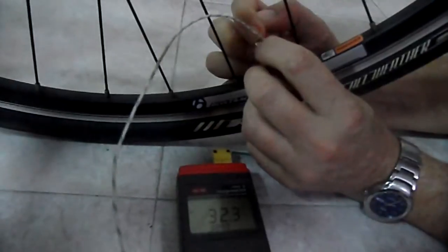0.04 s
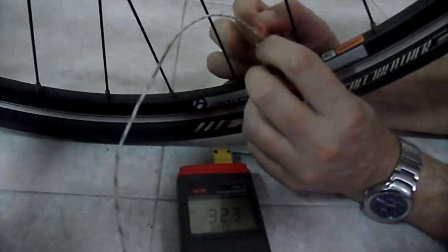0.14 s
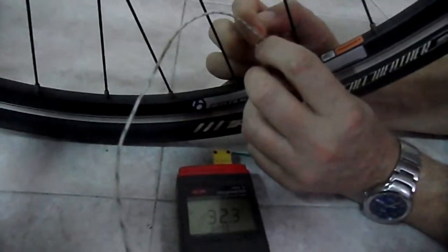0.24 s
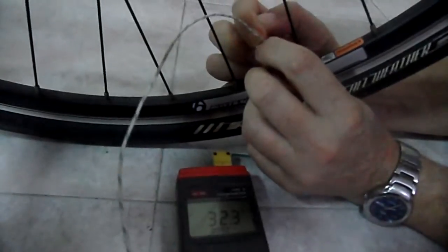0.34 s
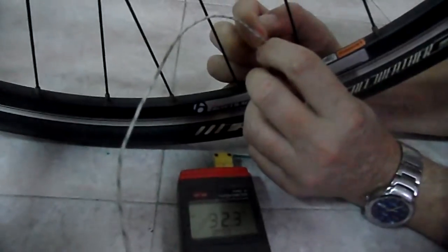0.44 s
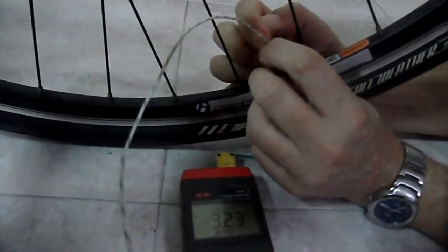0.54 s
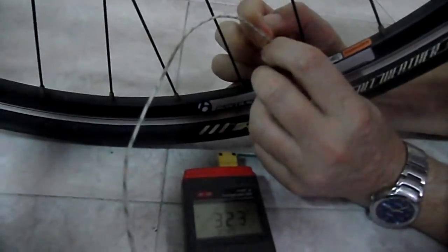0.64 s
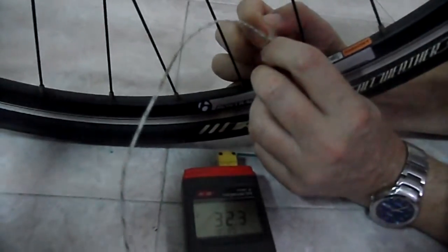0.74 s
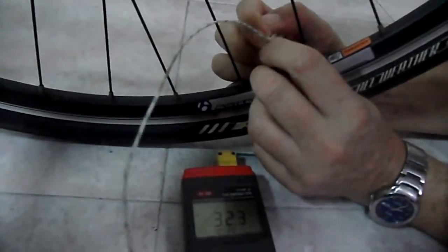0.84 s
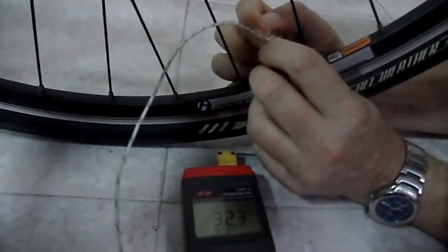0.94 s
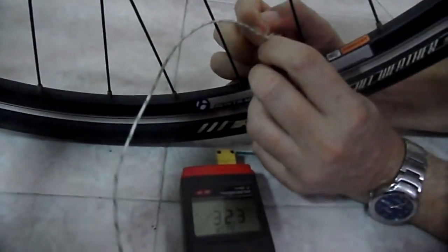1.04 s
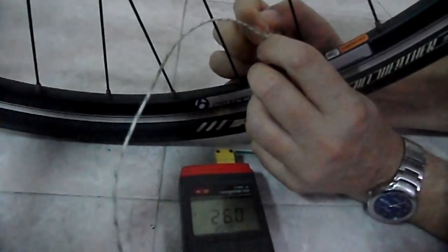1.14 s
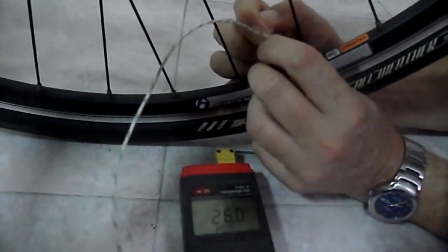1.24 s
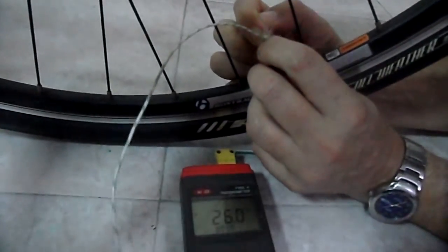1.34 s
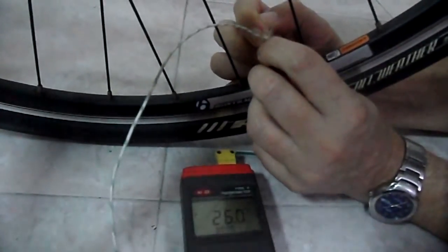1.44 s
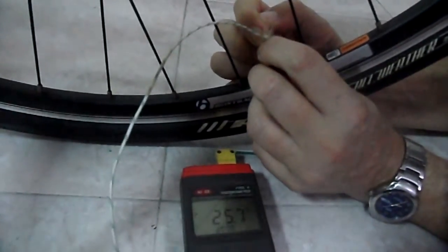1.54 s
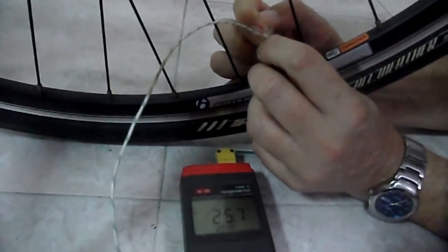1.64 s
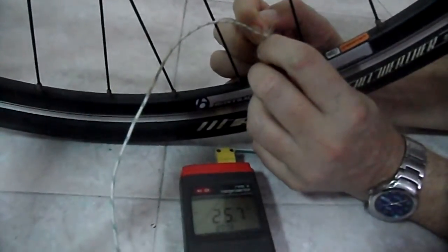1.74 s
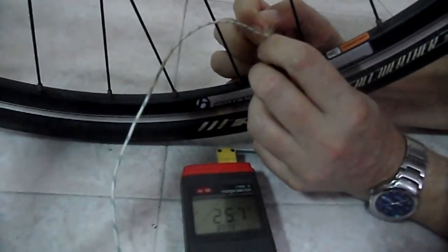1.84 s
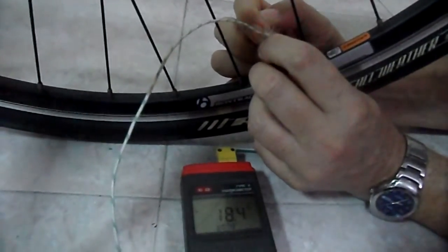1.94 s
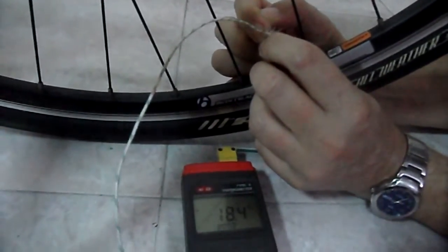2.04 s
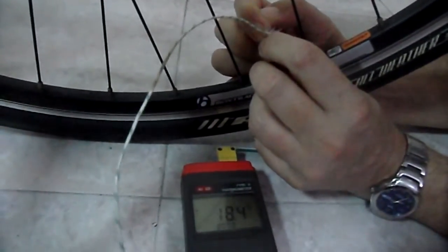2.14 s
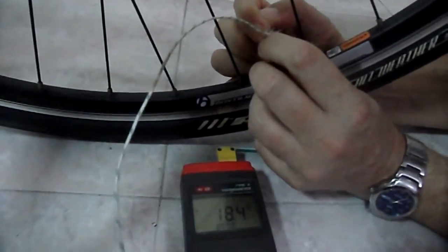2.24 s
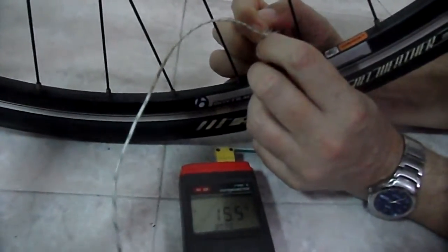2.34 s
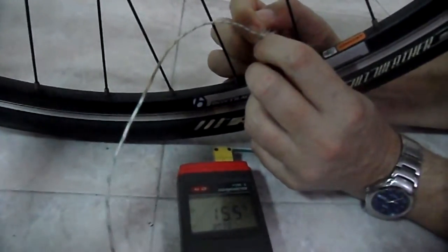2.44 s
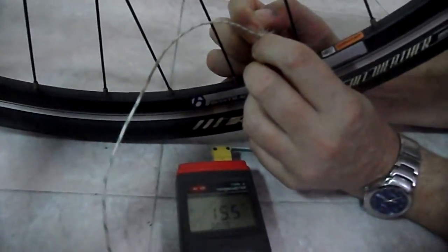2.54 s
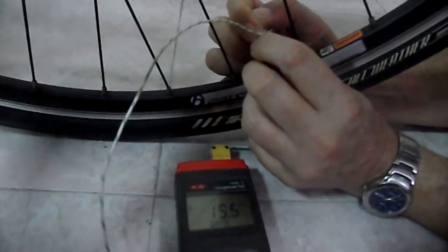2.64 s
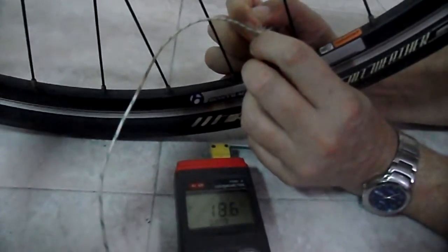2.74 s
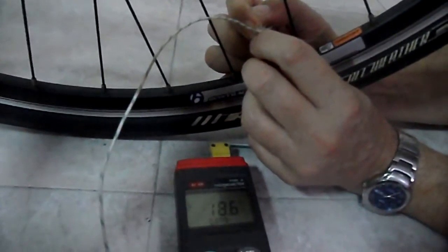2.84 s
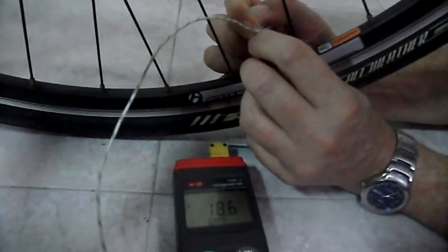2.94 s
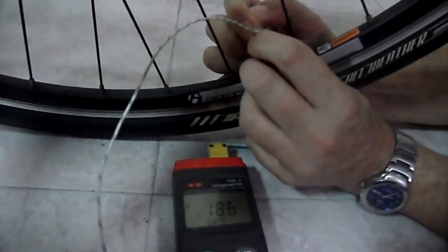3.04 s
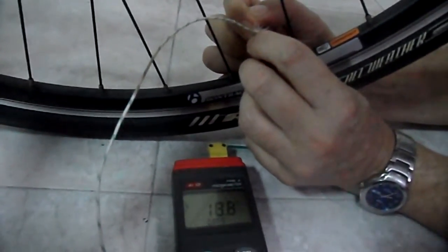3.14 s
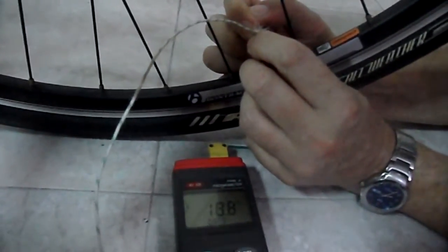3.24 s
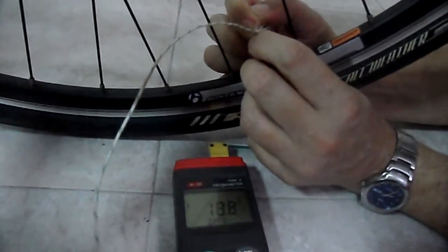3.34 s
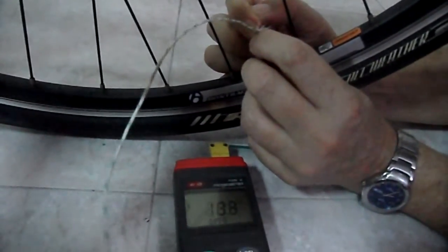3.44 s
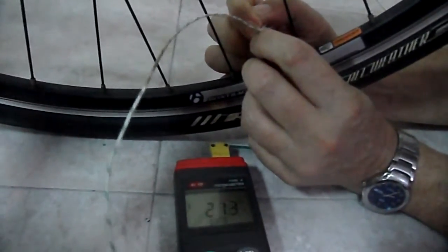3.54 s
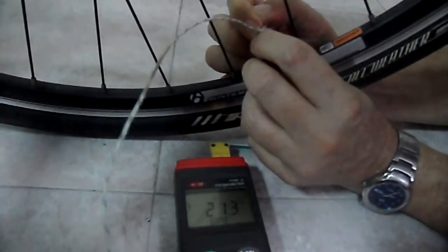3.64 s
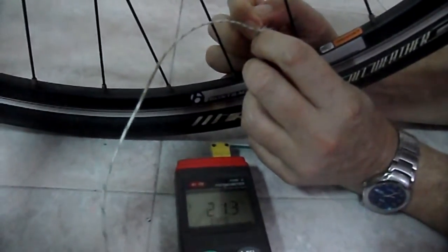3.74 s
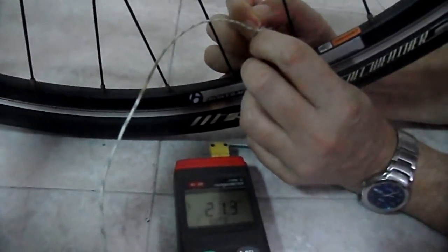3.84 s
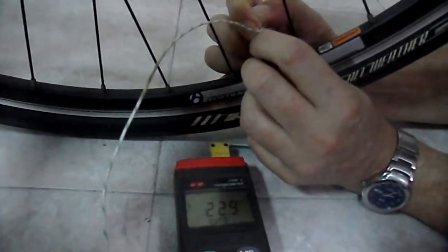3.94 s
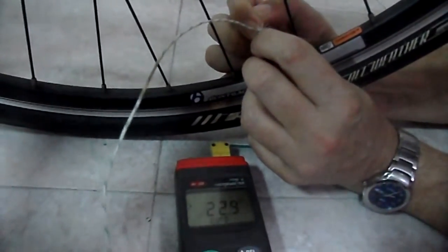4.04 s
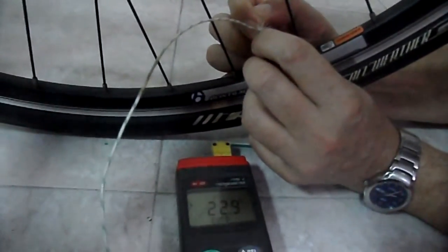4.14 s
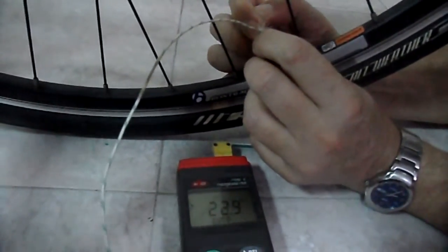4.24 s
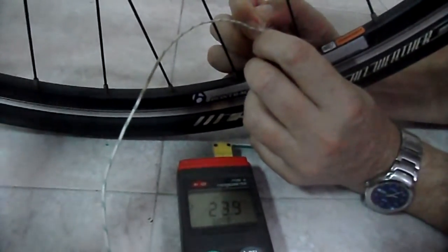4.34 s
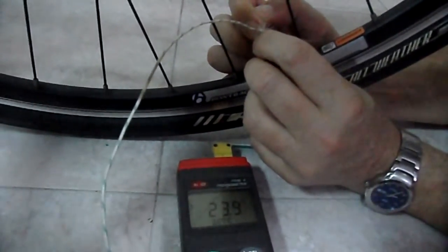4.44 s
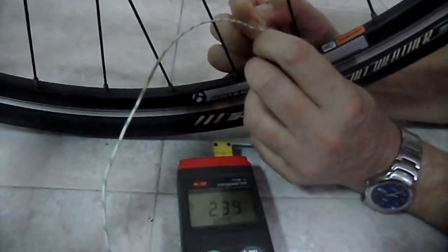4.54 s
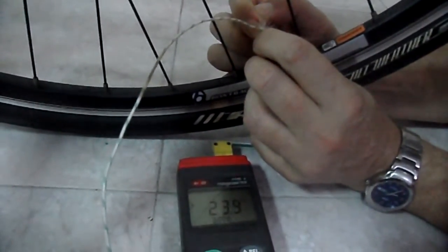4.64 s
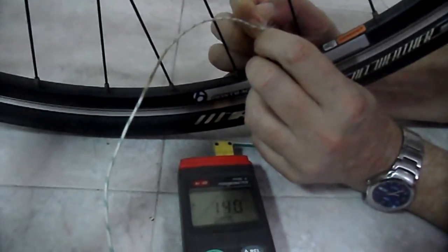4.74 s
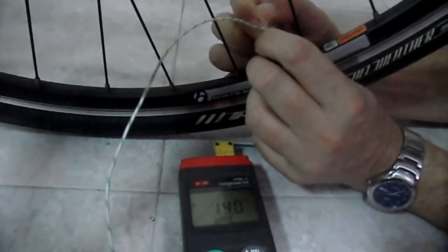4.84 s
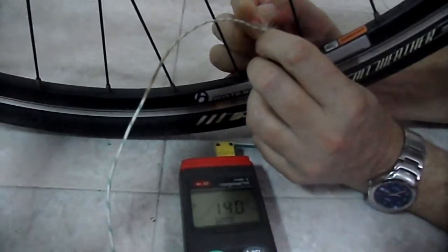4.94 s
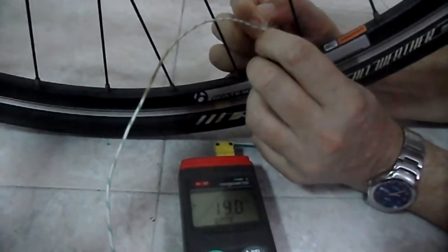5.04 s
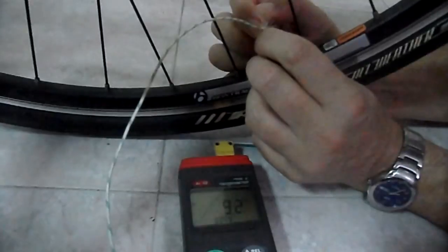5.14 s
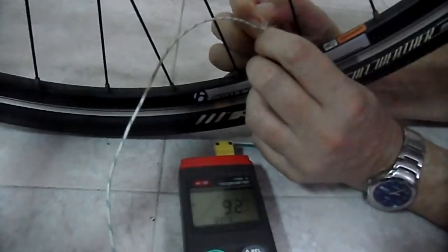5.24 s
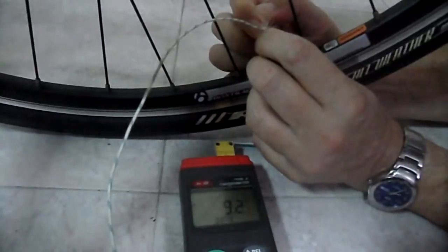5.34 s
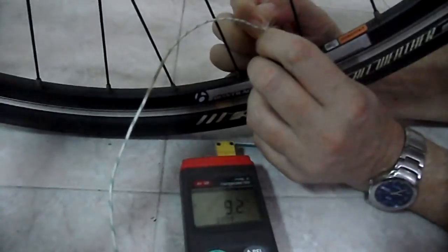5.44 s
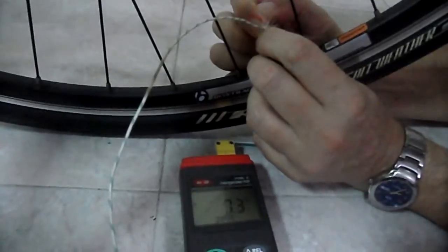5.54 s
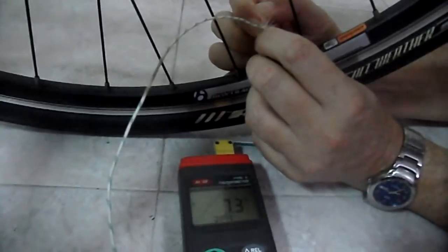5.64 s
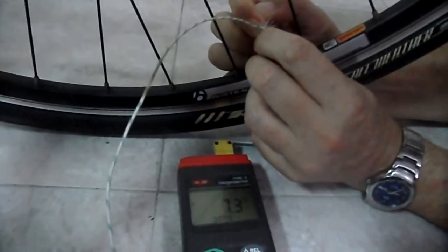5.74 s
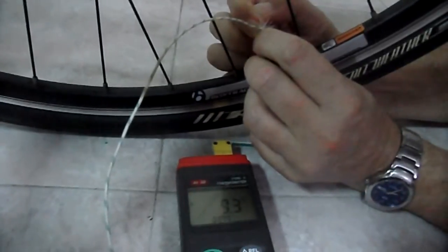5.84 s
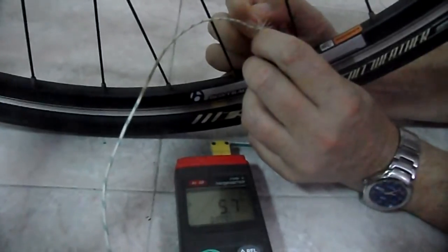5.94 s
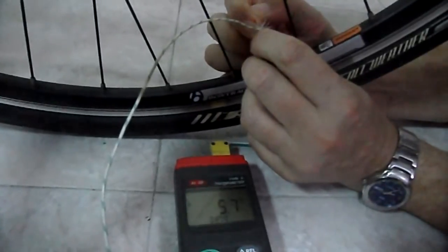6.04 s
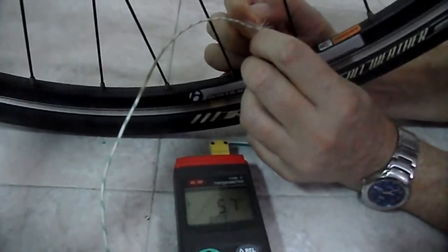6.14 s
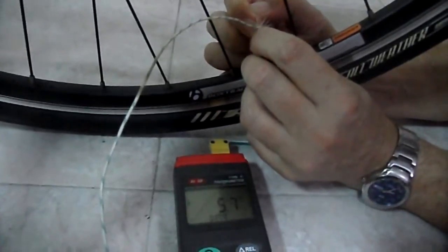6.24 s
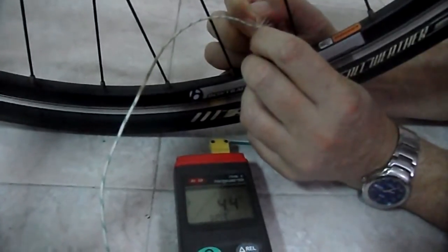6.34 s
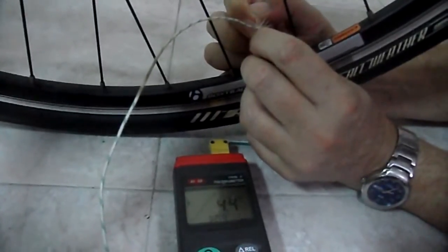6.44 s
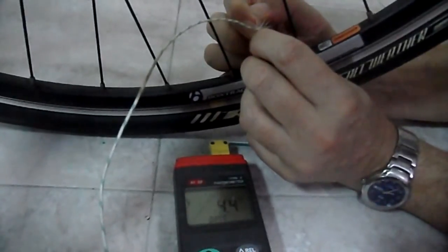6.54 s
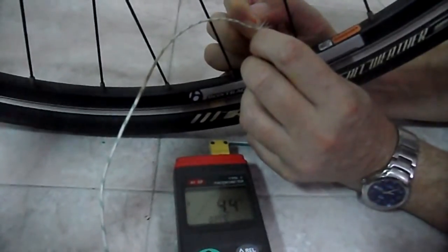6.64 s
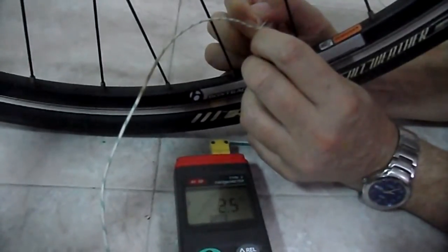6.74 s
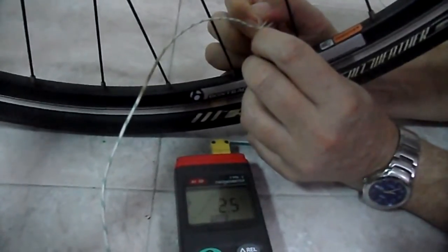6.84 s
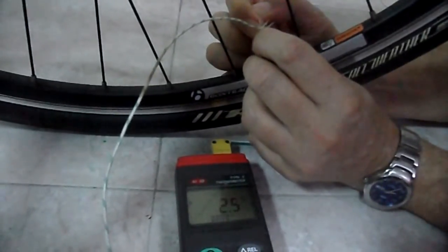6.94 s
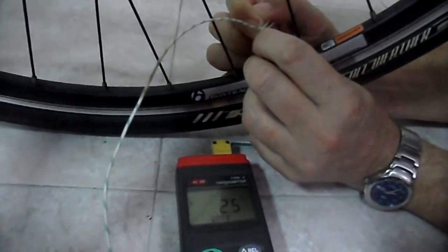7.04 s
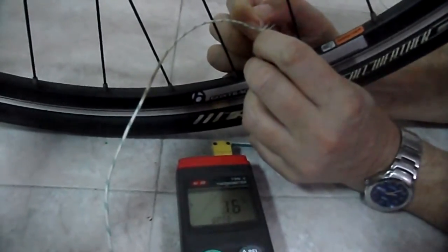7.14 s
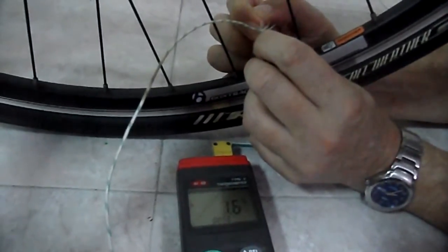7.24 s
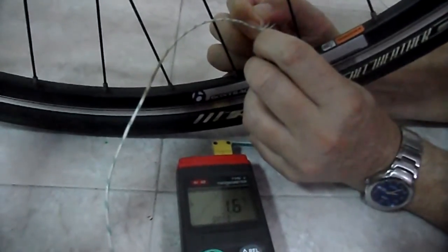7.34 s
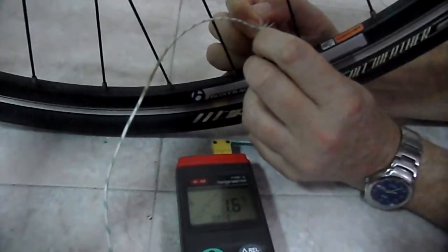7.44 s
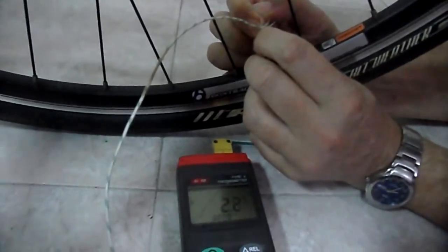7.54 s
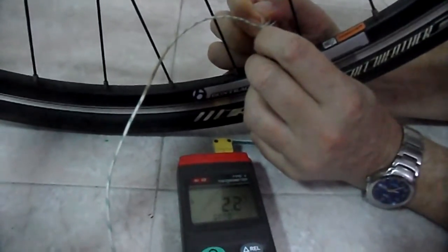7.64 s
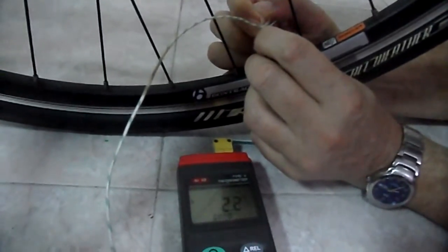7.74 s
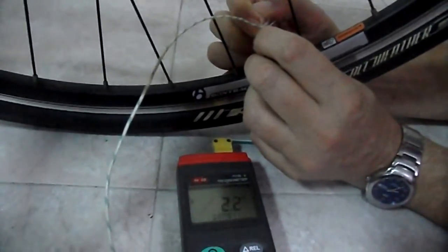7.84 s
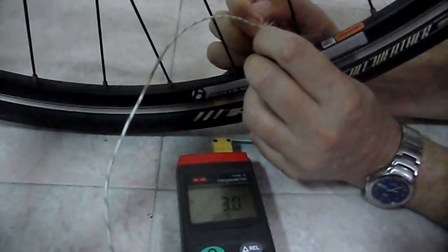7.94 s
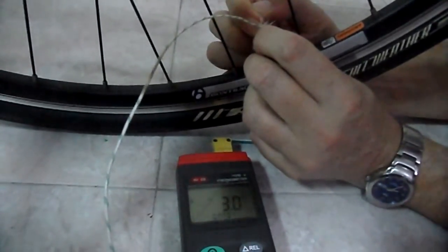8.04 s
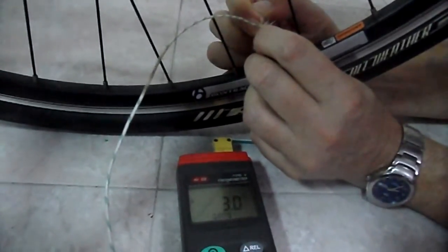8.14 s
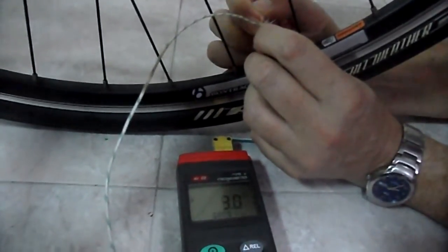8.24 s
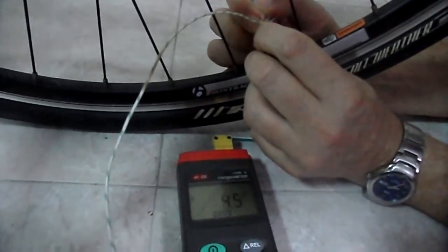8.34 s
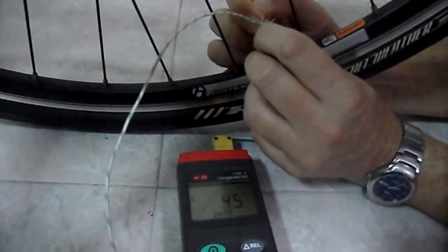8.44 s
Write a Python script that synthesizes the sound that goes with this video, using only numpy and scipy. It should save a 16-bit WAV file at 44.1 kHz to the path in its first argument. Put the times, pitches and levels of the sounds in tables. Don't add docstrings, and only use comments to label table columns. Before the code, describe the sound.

Very close to the microphone, a bicycle valve lets out a sharp popping spurt, a longer blast and a softer one, with quiet gaps between. After a tiny tick, a strong pop opens a long, bright hiss that slowly loses force. Stray air buffets the microphone in low thumps. The tiled room adds a short echo, and a faint engine and traffic drone sit far behind.

```python
import sys
import numpy as np
from scipy import signal
from scipy.fft import irfft
from scipy.io import wavfile
from scipy.ndimage import uniform_filter1d

SR = 44100
rng = np.random.default_rng(int(sys.argv[2]) if len(sys.argv) > 2 else 0)


def volts(x):
    e = np.asarray(x, float) / 20
    return 10 ** e


def put_to_file(sound):
    columns = np.atleast_2d(sound).T
    safe = np.clip(columns, -1, 1)
    whole_steps = np.round(safe * 32767)
    wavfile.write(sys.argv[1], SR, whole_steps.astype(np.int16))


N = 373968


def evened(x):
    return x / np.sqrt(np.mean(x ** 2) + 1e-20)


def read(points, hz, column=1):
    table = np.transpose(points)
    return np.interp(np.log(hz + 1), np.log(table[0] + 1), table[column])


def over_time(rows, column=1):
    table = np.transpose(rows)
    return np.interp(np.arange(N) / SR, table[0], table[column])


def bumps(modes, hz):
    return sum(db / (1 + (2 * (hz - centre) / width) ** 2) for centre, width, db in modes)


def noise_pair(same):
    a, b, c, d = rng.standard_normal((len(same), 4)).T
    same = np.clip(same, -1, 1)
    left = a + 1j * b
    right = same * left + np.sqrt(1 - same ** 2) * (c + 1j * d)
    return np.array([left, right])


def wander(top_hz):
    smooth = uniform_filter1d(rng.standard_normal(N), int(SR / top_hz / 4))
    return evened(signal.lfilter([1], [1, -np.exp(-2 * np.pi * top_hz / SR)], smooth))


def resonate(x, hz, width):
    turn = np.exp(2j * np.pi * np.cumsum(hz * np.ones(len(x))) / SR)
    r = np.exp(-np.pi * width / SR)
    return 2 * (turn * signal.lfilter([1 - r], [1, -r], x * turn.conj())).real


def fuzzy_tones(rows):
    out = 0
    for hz, width, db in rows:
        once = resonate(rng.standard_normal(N), hz, width)
        out = out + volts(db) * evened(resonate(once, hz, width))
    return out


def lumps(rows, pull=0):
    out, t = np.zeros((2, N)), np.arange(-2000, 2000) / SR
    for s, ms, left, right in rows:
        u = (t * 2000 / ms) ** 2
        start = round(s * SR) - 2000
        out[:, start:start + 4000] += np.outer([left, right], (1 - pull * u) * np.exp(-u))
    return out


CRACK_DB, CRACK_MS, CRACK_LEAD_MS = -8.5, 0.77, 2.25

# (time [s], level [dB])
PRESSES = [
    [(.773, -12.5), (.81, -18), (.891, -21), (.927, -36), (.935, -48)],
    [(1.236, -31.5), (1.246, -30.5), (1.296, -21), (1.418, -25), (1.598, -20.5), (2.016, -19),
     (2.034, -26.5), (2.05, -42)],
    [(2.506, -31), (2.516, -25.5), (2.84, -26), (2.876, -31), (2.91, -44), (2.92, -54)],
    [(4.125, -15.5), (4.35, -21), (4.75, -18.5), (5.2, -17.5), (6.1, -20), (6.3, -19.5), (7.55, -23),
     (7.67, -23.5), (8.48, -26.5)],
]
PART_EDGES_HZ = [2600, 6700, 10500]
# (frequency [Hz], level [dB per Hz])
JET = [(210, -39), (350, -28), (1050, -24.5), (1570, -15), (2620, -22), (3360, -14.5), (3860, -17),
       (5960, -14), (11600, -3), (14200, -1.5)]
# (frequency [Hz], width [Hz], level above the jet [dB])
STEM = [(622, 820, 5), (1610, 220, 6), (1932, 280, 3), (2968, 330, 5), (3388, 290, 8), (4250, 180, 6),
        (4760, 300, 4), (5590, 200, 0.5), (6220, 350, 6), (7520, 250, 5.5), (8510, 370, 2),
        (9780, 289, 0.5), (11340, 240, 5), (11740, 210, 5), (12400, 450, 4), (13200, 530, 3.5)]
# (frequency [Hz], width [Hz], depth [dB])
DIPS = [(2670, 125.5, -3), (3850, 200, 0.5), (6140, 150, 8.5), (6620, 150, 5), (9120, 100, 6.5)]
# (frequency [Hz], left-right level [dB], likeness [0-1], left lead [rad])
PORTS = [(4800, 0, .97, 0), (6000, 1.4, .34, .1), (6500, .4, .95, 0), (8300, .2, .93, 0),
         (9100, -1, .49, -1.2), (9800, 1.1, .82, -.3), (10800, -4.7, .59, -.7), (11400, -4.1, .89, .1),
         (11800, -2.1, .89, .4), (12600, .8, .54, 0), (13100, .3, .85, .5), (13500, 5.9, .79, .5),
         (14000, 1.8, .47, -.6), (14300, .7, .55, -.1)]
PART_DB = [0.5, -7, -14, -25.5]
WEAK_SHARE = [0.032, 0.35, .3, 0]
SLACK_DB_PER_S = [-2, 1, 0.84, 1]
SPIT_DB = [1.5, 0.5, -2.5, 10]
FULL_DB, SLACK_S, SPIT_MS = -19.5, 6.44, 3.4


def jet(flutter_db=.7, rise_ms=1.5, shut_ms=4.):
    hz = np.fft.rfftfreq(N, 1 / SR)
    skew = volts(read(PORTS, hz) / 2) * np.exp(.5j * read(PORTS, hz, column=3))
    spectra = noise_pair(read(PORTS, hz, column=2)) * [skew, 1 / skew]
    spectra *= volts(read(JET, hz) + bumps(STEM, hz) - bumps(DIPS, hz))
    above = [1 / (1 + (edge / (hz + 1)) ** 12) for edge in PART_EDGES_HZ]
    shares = [above[2], above[1] - above[2], above[0] - above[1], 1 - above[0]]
    out = np.zeros((2, N))
    for k, share in enumerate(shares):
        part = irfft(spectra * np.sqrt(abs(share)), N)
        part /= np.std(part.mean(0))
        for rows, (pop_s, _, _) in zip(PRESSES, POPS):
            s, level = np.transpose(rows)
            span = slice(round((pop_s - .01) * SR), round((s[-1] + .1) * SR))
            t = np.arange(N)[span] / SR
            since_ms = np.maximum((t - pop_s) * 1000 + CRACK_LEAD_MS, 0)
            closing = np.exp(-np.maximum(t - s[-1], 0) * 1000 / shut_ms)
            opening = np.minimum(since_ms / rise_ms, 1) * closing
            flow_db = np.interp(t, s, level)
            weak_db = WEAK_SHARE[k] * (FULL_DB - flow_db)
            spit_db = SPIT_DB[k] * np.exp(-since_ms / SPIT_MS)
            slack_db = SLACK_DB_PER_S[k] * np.maximum(t - SLACK_S, 0)
            out[:, span] += part[:, span] * opening * volts(flow_db + PART_DB[k] + weak_db + spit_db + slack_db)
    return out * volts(flutter_db * wander(30.))


# (time [s], peak level [dB], length [ms])
POPS = [
    (0.7747, -16.5, 6.1),
    (1.238, -45, 4.),
    (2.508, -35.5, 2.3),
    (4.114, -16, 2.5),
]


def pops(cut_hz=47.0):
    cracks = [(s - CRACK_LEAD_MS / 1000, db + CRACK_DB, CRACK_MS) for s, db, ms in POPS]
    pushes = lumps([(s, ms, -volts(db + .8), -volts(db - .8)) for s, db, ms in POPS + cracks])
    return signal.lfilter(*signal.butter(1, cut_hz, "high", fs=SR), pushes)


# (time [s], length [ms], left pressure, right pressure [full scale])
EDDIES = [(.917, 29, -0.2, -0.31), (.912, 3.5, -0.013, -.02), (.951, 2.8, 0.03, -0.11),
          (.962, 44, 0.097, 0.17), (.964, 1.8, 0.01, 0.059), (.968, 5, 0.1, 0.086), (.978, 4.5, 0.078, -.1),
          (.994, 30, -0.073, -0.1), (1.018, 4.5, -.02, .05), (1.87, 6, 0.082, 0.02),
          (1.965, 4.5, -0.048, 0.047), (1.98, 45, 0.11, .1), (2.09, 28, .05, 0.081),
          (7.798, 8.4, -0.21, -0.024), (7.803, 3.35, .24, -0.028), (7.811, 7, 0.15, 0.00069),
          (7.819, 21, -0.21, -0.0038), (7.855, 3.7, .07, -0.0055), (7.874, 2.7, 0.089, 0.013)]
# (middle time [s], length [s], level [dB], share of small swirls)
GUSTS = [
    (0.981, 0.18, -33.5, .6),
    (1.933, 0.62, -34, 0.38),
    (7.19, .3, -36.5, 0.076),
    (7.86, 0.27, -35.5, .9),
]
CALM_DB = -55.5
SWIRLS_PER_S, SWIRL_MS, SWIRL_DB = 110, 3.3, 2.5


def gusts(cut_hz=9.2):
    hz, t = np.fft.rfftfreq(N, 1 / SR), np.arange(N) / SR
    deep = 1 / (1 + (hz / 30.) ** 2) ** 0.9 / (1 + (hz / 250.) ** 4)
    rumble = evened(irfft(noise_pair(.4 + 0 * hz) * deep, N))
    blowing, stirring = np.zeros(N), np.zeros(N)
    for s, length, db, share in GUSTS:
        gust = volts(db) * np.exp(-((t - s) * 3 / length) ** 2)
        blowing += gust
        stirring += share * gust
    kicks = rng.standard_normal((N, 2)).T * (rng.random(N) < SWIRLS_PER_S / SR)
    swirl = np.exp(-(np.arange(-400, 400) * 2000 / SR / SWIRL_MS) ** 2)
    swirls = volts(SWIRL_DB) * signal.oaconvolve(kicks, swirl[None], "same") * stirring
    pressure = lumps(EDDIES, pull=.6) + rumble * (volts(CALM_DB) + blowing) + swirls
    return signal.filtfilt(*signal.butter(1, cut_hz, "high", fs=SR), pressure)


# (time [s], level [dB], frequency [Hz])
TICK = (3.975, -52, 3370)


def tick():
    s, db, hz = TICK
    t = np.maximum(np.arange(N) / SR - s, 0)
    ring = np.sin(2 * np.pi * hz * t) + 0.56 * np.sin(2 * np.pi * 1800.0 * t)
    return volts(db - 60 * t / 0.028) * ring


# (frequency [Hz], time to fall 60 dB [s], level [dB])
ROOM = [(400, .5, 0), (2000, .52, 0), (4000, .52, 2), (6000, .5, 2), (10000, .44, -1), (14000, .4, -2)]


def room(x):
    taps = np.zeros((2, SR))
    at = np.arange(300, SR - 20, 20) + rng.integers(0, 20, (2, (SR - 301) // 20))
    np.put_along_axis(taps, at, rng.choice([-1., 1.], at.shape), 1)
    hz, t, z = signal.stft(taps, SR, nperseg=256)
    evening_db = 2 - .6 * (bumps(STEM, hz) - bumps(DIPS, hz))
    start_db = read(ROOM, hz, column=2) + evening_db
    fading_db = start_db[:, None] - 60 * t / read(ROOM, hz)[:, None]
    tail = signal.istft(z * volts(fading_db), SR, nperseg=256)[1]
    return signal.fftconvolve(x[None], tail / np.linalg.norm(tail[0]), axes=1)[:, :N]


# (time [s], lower pitch [Hz], upper pitch [Hz])
BOOMS = [(0, 55.3, 140.3), (.7, 61.2, 146), (1.7, 61.8, 149), (2.3, 63.2, 126.8), (3.9, 63.9, 136.3),
         (8.48, 64.1, 137)]
# (level [dB], width [Hz])
BOOM_SHAPES = [(-48.5, 6.7), (-60, 4.1)]


def booms():
    low, high = [volts(db) * evened(resonate(rng.standard_normal(N), over_time(BOOMS, column), width))
                 for column, (db, width) in enumerate(BOOM_SHAPES, 1)]
    return low + high * volts(1.5 * wander(1.5))


# (time [s], rate [Hz])
FIRING = [(0, 62.2), (8.48, 62.5)]
CYLINDERS_DB = [-4.5, -17.5, -1, -10, -18, -19.5]


def engine(level_db=-63, ring_ms=3.6):
    firing = over_time(FIRING)
    turns = np.cumsum(firing) / SR + 3.6
    count = turns.astype(int)
    blow_db = np.array(CYLINDERS_DB)[count % 6] + 3. * rng.standard_normal(900)[count]
    gate = volts(blow_db) * np.exp(-(turns % 1) / firing * 1000 / ring_ms)
    band = signal.butter(1, [700., 4500.], "band", fs=SR)
    rattle = evened(signal.lfilter(*band, rng.standard_normal(N)))
    return volts(level_db) * gate * rattle


# (frequency [Hz], level [dB per Hz])
AIR = [(12, -42), (20, -3.5), (65, -7.5), (93, -16), (133, -20), (279, -27.5), (389, -29.5), (422, -37.5),
       (655, -32), (751, -36), (1040, -38.5), (1370, -41), (1960, -43), (2660, -47), (14200, -70)]
# (frequency [Hz], likeness [-1 to 1])
AIR_SAME = [(60, 0.98), (150, 1), (380, 0.95), (950, 0.81), (2370, 0.655), (5960, 0.0044), (14900, -0.063)]
AIR_DB = -43


def room_air():
    hz = np.fft.rfftfreq(N, 1 / SR)
    return volts(AIR_DB - 3.0) * evened(irfft(noise_pair(read(AIR_SAME, hz)) * volts(read(AIR, hz)), N))


# (frequency [Hz], width [Hz], level [dB])
HUMS = [(647, 70, -69.5), (2460, 146, -79.5)]
# (frequency [Hz], width [Hz], level [dB])
WHINES = [(9600, 200, -89), (12900, 350, -87)]


def faint_tones():
    return fuzzy_tones(HUMS) + np.array([fuzzy_tones(WHINES), fuzzy_tones(WHINES)])


def ambience(duck_db):
    sunk_booms = booms() * volts(0.897 * duck_db)
    tilt_db = np.array([[.7], [-.7]])
    return (room_air() + faint_tones() + sunk_booms + engine()) * volts(tilt_db + duck_db)


def self_noise(level_db=-69.0, from_hz=6000.):
    hiss = rng.standard_normal((N, 2)).T
    return volts(level_db) * signal.lfilter(*signal.butter(1, from_hz, "high", fs=SR), hiss)


QUIET_DB, DUCK_FROM_DB, DUCK_SHARE = 3, -30, 0.3
RECOVER_DB_PER_S, DUCK_MS = 4, 44


def ducking(loud):
    power_db = 10 * np.log10(abs(uniform_filter1d((loud ** 2).mean(0), 800)) + 1e-12)
    fall = np.arange(N) * RECOVER_DB_PER_S / SR
    held_db = np.maximum.accumulate(power_db + fall) - fall
    over_db = np.maximum(held_db - DUCK_FROM_DB, 0)
    keep = np.exp(-1000 / DUCK_MS / SR)
    return QUIET_DB - DUCK_SHARE * signal.lfilter([1 - keep], [1, -keep], over_db)


def scene():
    hiss = jet()
    echo = volts(-16.5) * room(hiss.mean(0))
    return hiss + echo + pops() + gusts() + tick() + ambience(ducking(hiss)) + self_noise()


def roll_off(x):
    return signal.sosfilt(signal.butter(12, 15540, fs=SR, output="sos"), x)


def record(dry):
    low_pass = signal.firwin(1023, 14190, window=("kaiser", 10), fs=SR)
    mix = signal.oaconvolve(dry, low_pass[None], "same")
    return roll_off(mix)


dry = scene()
out = record(dry)
put_to_file(out)
```